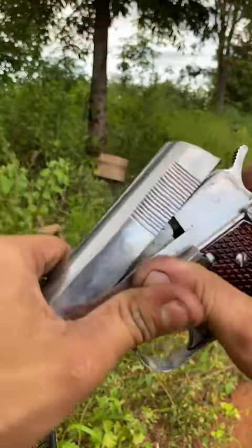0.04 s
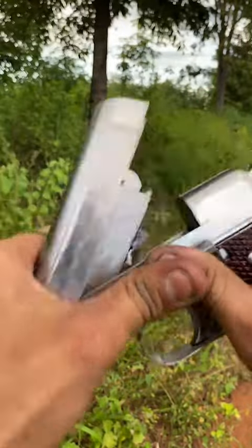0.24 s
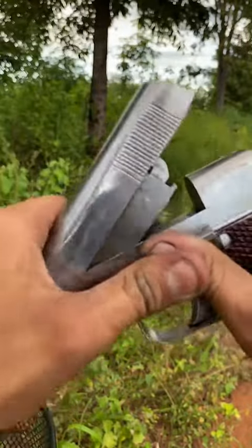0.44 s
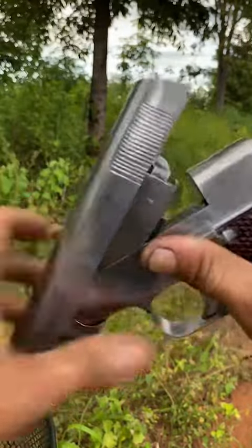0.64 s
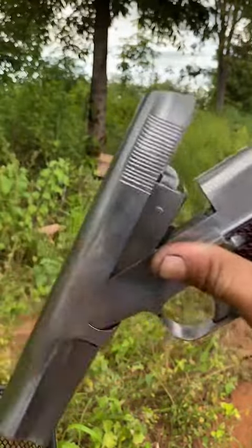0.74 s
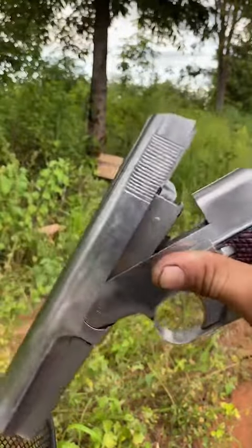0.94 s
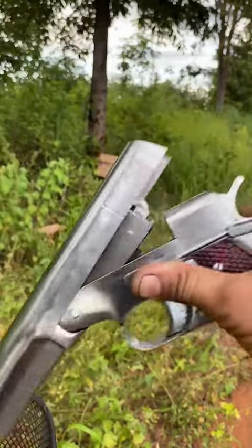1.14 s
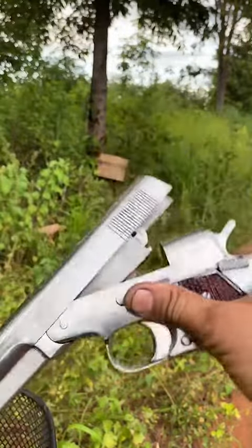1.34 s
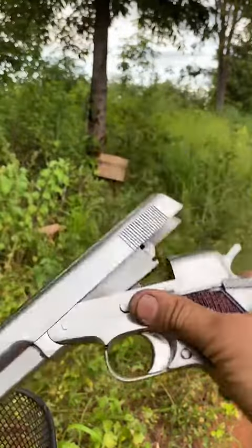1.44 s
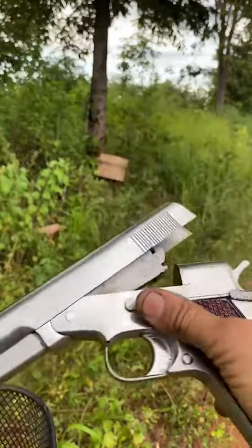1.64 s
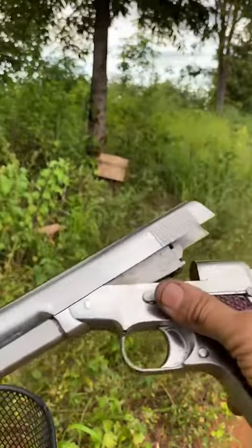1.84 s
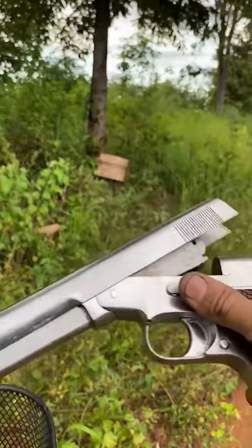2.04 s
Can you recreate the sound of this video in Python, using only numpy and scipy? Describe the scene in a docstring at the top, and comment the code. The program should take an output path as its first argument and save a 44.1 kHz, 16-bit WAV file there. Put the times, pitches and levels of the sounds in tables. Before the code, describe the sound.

A steel pistol is broken open close to the microphone with one sharp clack and a low thump. Faint handling ticks follow, while insects chirr and chirp softly among the trees.

```python
"""Outdoors among trees, a steel break-action pistol is opened close to the microphone.
Stick-slip friction at the latch excites the frame's modes; the barrel clacks against its stop,
jolts the hands and scatters sound off the trees. The hinge slides and loose parts tick.
Insects chirr all round, over a low rumble of air and handling."""
import sys
import numpy as np
from scipy import signal
from scipy.fft import rfft, irfft
from scipy.io import wavfile
from scipy.ndimage import map_coordinates

SR = 44100
rng = np.random.default_rng(int(sys.argv[2]) if len(sys.argv) > 2 else 0)


def unload_audio(sound):
    """Save the sound as a 16-bit wav file, at the path given as the first command line argument."""
    columns = np.transpose(np.atleast_2d(sound))
    # keep every value between -1 and 1, then stretch to whole-number steps
    steps = np.round(np.clip(columns, -1, 1) * 32767)
    wavfile.write(sys.argv[1], SR, steps.astype(np.int16))


N = 92610


def amp(db):
    """Amplitude ratio of a level in decibels."""
    return 10 ** (np.asarray(db) / 20)


def level(rows):
    """Gain envelope, linear in decibels between (time_s, level_db) rows."""
    return amp(np.interp(np.arange(N) / SR, *np.transpose(rows)))


def since(start_s):
    """Seconds elapsed since an onset, zero before it."""
    return np.maximum(np.arange(N) / SR - start_s, 0)


def decay(t, t60):
    """Exponential damping: 60 dB lost every t60 seconds."""
    return amp(-60 * np.minimum(t / t60, 5))


def fade(t, t60, attack_s):
    """Transient envelope: a quick rise, then exponential damping."""
    return decay(t, t60) * (1 - np.exp(-t / attack_s))


def pan(db):
    """Interaural level difference: gains with left db above right."""
    return amp(np.array([[db], [-db]]) / 2)


def wobble(knots_per_s):
    """Random modulation: a spline through Gaussian values."""
    return map_coordinates(rng.standard_normal(1000), [np.arange(N) * knots_per_s / SR], mode="wrap")


def coloured(x, colour):
    """Spectral shaping by (frequency_hz, gain_db) rows, joined on a log frequency axis."""
    hz, db = np.transpose(colour)
    gain_db = np.interp(np.log(np.fft.rfftfreq(N, 1 / SR) + 1), np.log(hz + 1), db)
    return irfft(rfft(x) * amp(gain_db), N)


def band(centre_hz, width_hz):
    """Gaussian passband, 4 dB down at width_hz from its centre."""
    return [(centre_hz + k * width_hz, -4 * k * k) for k in range(-5, 6)]


def noise(colour, coherence):
    """Partly coherent stereo noise of unit rms, mixed from mid and side signals."""
    turn = np.arccos(np.clip(coherence, -1, 1)) / 2
    mid, side = coloured(rng.standard_normal((2, N)), colour)
    x = np.cos(turn) * mid + np.sin(turn) * np.array([side, -side])
    return x / x.std()


def echo(x, t60):
    """Diffuse scattering from trunks and leaves: convolution with decaying noise."""
    tail = rng.standard_normal((2, N)) * fade(since(0), t60, 0.0061)
    return signal.fftconvolve(x, tail / np.linalg.norm(tail[0]), axes=1)[:, :N]


# Envelope of the rumble: time_s, level_db
RUMBLE_ENVELOPE = [(0, -65), (.13, -51), (.3, -68), (.75, -63.5), (1.07, -61.5), (1.25, -61), (1.5, -68.5),
                   (1.8, -76), (1.96, -69.5), (2.1, -66.5)]
# Spectra of the rumble and the hiss: frequency_hz, gain_db
RUMBLE_SPECTRUM = [(20, -22.5), (45, -2), (70, 6), (110, -2.5), (170, -17), (280, -29), (4000, -85)]
HISS_SPECTRUM = [(100, 8.5), (500, 2.5), (1200, -1.5), (7300, -13.5), (15800, -22.5)]

def air():
    """Ambient noise: a modulated rumble of air and handling under a steady hiss."""
    rumble = level(RUMBLE_ENVELOPE) * amp(1.2 * wobble(25)) * noise(RUMBLE_SPECTRUM, coherence=.99)
    return rumble + amp(-84.5) * noise(HISS_SPECTRUM, coherence=.1)


# Envelope of the highest insect: time_s, level_db
SIZZLE_ENVELOPE = [(.17, -77.5), (.3, -88), (1.5, -86.5)]
# Its spectrum: frequency_hz, gain_db
SIZZLE_SPECTRUM = [(8300, -30), (9100, -1.5), (9500, 2.5), (10300, -3), (11500, -12.5), (13000, -20.5)]

def insect_sizzle(swell_db=3.2, period_s=.29, peak_s=1.54):
    """Amplitude modulation: the highest insect swells three or four times a second."""
    swell = np.cos(2 * np.pi * (since(0) - peak_s) / period_s)
    modulation = amp(swell_db * swell + wobble(20))
    return level(SIZZLE_ENVELOPE) * modulation * noise(SIZZLE_SPECTRUM, coherence=.56)


# Envelopes of the chorus and the cricket, both dipping after the clack: time_s, level_db
CHORUS_ENVELOPE = [(0, -56.5), (.19, -62.5), (.25, -76), (.37, -86.5), (.45, -66.5), (1.2, -65), (1.6, -64),
                   (2.1, -63)]
CRICKET_ENVELOPE = [(0, -73), (.16, -67), (.25, -105), (.62, -105), (.72, -77.5), (1.2, -83.5),
                    (1.32, -105), (1.5, -78), (1.68, -74.5), (1.82, -87.5), (2.05, -78.5)]
# Spectrum of the chorus: frequency_hz, gain_db
CHORUS_SPECTRUM = [(2500, -70), (3700, -31), (4150, -12), (4550, 1), (4950, 0), (5350, -8), (5800, -23.5),
                   (6600, -25), (7200, -58)]

def insect_chorus():
    """Incoherent summation: far insects merge into a fluttering band; one cricket buzzes above."""
    crowd = level(CHORUS_ENVELOPE) * amp(1.65 * wobble(51)) * noise(CHORUS_SPECTRUM, coherence=.2)
    buzz = noise(band(centre_hz=8020, width_hz=150), coherence=0)
    return crowd + level(CRICKET_ENVELOPE) * amp(1.5 * wobble(30)) * buzz


# Trains of insect chirps, the nearest first: first_s, last_s, level_db
CHIRP_TRAINS = [(0.013, .148, -54.5), (.43, .565, -71), (0.623, .765, -67), (1.01, 1.145, -78.5),
                (1.21, 1.277, -69.5), (1.337, 1.67, -65.5), (1.73, 1.865, -73), (1.932, 2.065, -63.5)]

def insect_chirps(period_s=.0675, length_s=.04, pitch_hz=6720, fall_hz_per_s=18000):
    """Falling frequency sweeps; fainter trains have a lower direct-to-reverberant ratio."""
    song, direct = np.zeros((2, N))
    nearest_db = CHIRP_TRAINS[0][2]
    for first_s, last_s, db in CHIRP_TRAINS:
        for k in range(round((last_s - first_s) / period_s) + 1):
            t = since(first_s + k * period_s + .003 * rng.normal())
            cycles = (pitch_hz + 50 * rng.normal()) * t - fall_hz_per_s * t ** 2 / 2
            note = amp(db) * np.sin(np.pi * np.minimum(t / length_s, 1)) * np.sin(2 * np.pi * cycles)
            song += note
            direct += amp(.4 * (db - nearest_db)) * note
    return amp(-3.5) * direct * pan(db=2) + amp(-2) * echo(song[None], t60=.25)


# Bumps of the hands on the grip: start_s, level_db, t60_s
GRIP_BUMPS = [(0.2138, -27, 0.055), (0.995, -62, 0.16), (2.046, -68, 0.29)]
# Their spectrum: frequency_hz, gain_db
BUMP_SPECTRUM = [(40, 0), (120, 0), (470, -3), (650, -15), (1200, -29), (4000, -51.5)]
# Low hums as the hands shift: start_s, length_s, pitch_hz, level_db
GRIP_HUMS = [(0.1, 0.09, 73.3, -42.5), (.212, .06, 30, -31), (.28, 0.2, 47.8, -48.5),
             (0.465, 0.24, 46.86, -50), (1.01, 0.13, 115.9, -55)]

def hands():
    """Handling noise: soft contacts put their energy into low bumps and hums."""
    bumps = sum(amp(db) * fade(since(s), t60, .0022) for s, db, t60 in GRIP_BUMPS)
    out = bumps * noise(BUMP_SPECTRUM, coherence=.48)
    for start_s, length_s, hz, db in GRIP_HUMS:
        t = since(start_s)
        out += amp(db) * np.sin(np.pi * np.minimum(t / length_s, 1)) * np.sin(2 * np.pi * hz * t)
    return out


def jolt(start_s=.2126, start_hz=480, end_hz=68, sink_s=.0026):
    """Damped oscillation: the stop gives the hands a low push whose pitch sinks as it dies."""
    t = since(start_s)
    cycles = end_hz * t + (start_hz - end_hz) * sink_s * (1 - np.exp(-t / sink_s))
    return amp(-7) * fade(t, t60=.04, attack_s=.00097) * np.sin(2 * np.pi * cycles) * pan(db=-2)


# Envelope of the sliding hinge: time_s, level_db
HINGE_ENVELOPE = [(0, -82.5), (.3, -81), (.46, -71.5), (.6, -81), (.72, -88.5), (.85, -110)]
# Spectrum of the sliding steel, also given to the clack's scatter: frequency_hz, gain_db
STEEL_SPECTRUM = [(300, -11), (1200, -13.5), (2200, 2.5), (4000, 1.5), (6000, -6.5), (7500, -22),
                  (9200, -3.5), (11500, -3.5), (13000, -23), (15800, -24.5)]

def hinge():
    """Sliding friction: steel on steel makes noise with a rapidly flickering level."""
    return level(HINGE_ENVELOPE) * amp(1.5 * wobble(140)) * noise(STEEL_SPECTRUM, coherence=.52)


# Contacts of loose parts: start_s, level_db, pitch_hz, ring_db, edge_trim_db, body_trim_db
LOOSE_CONTACTS = [(.1698, -50, 2900, 3, -11, -8), (0.1745, -55, 2550, 4, -12, -2),
                  (0.3625, -53, 2247, 0, 5, -24), (0.4222, -52, 2817, 3, -3, 1),
                  (0.5505, -47, 2820, 5, -5, -5), (.552, -49, 4895, 5, 5, -11),
                  (0.7322, -68, 1100, 0, -12, 13), (0.914, -60, 2635, 5, -10.5, -5.5),
                  (1.455, -76, 2780, 3, -20, -12), (1.7639, -47.5, 2827, 2, -18, -4),
                  (1.7834, -57, 3114, 0, -20, 8), (1.9048, -54, 2852, -0.5, -18, -12.5)]
# Spectra of a tick's click, bright edge and dull body: frequency_hz, gain_db
CLICK_SPECTRUM = [(700, -31), (1300, -12.5), (2000, -8), (2800, 3.5), (3400, -5), (4100, -6), (5500, -4),
                  (7500, -28), (15800, -54.5)]
EDGE_SPECTRUM = [(2500, -30), (5000, 0), (7500, -12.5), (9000, -3), (11200, 1), (14000, -20)]
BODY_SPECTRUM = [(250, -20), (620, 1), (950, -8.5), (1320, 5), (1550, -8), (2100, -9), (3500, -30)]

def loose_parts(attack_s=.00047):
    """Impulsive excitation: each light contact gives a noise burst and rings one damped mode."""
    out = np.zeros((2, N))
    click = noise(CLICK_SPECTRUM, coherence=.6)
    edge = amp(-7.5) * noise(EDGE_SPECTRUM, coherence=.2)
    body = amp(-13.5) * noise(BODY_SPECTRUM, coherence=.7)
    for start_s, db, hz, ring_db, edge_trim_db, body_trim_db in LOOSE_CONTACTS:
        t = since(start_s)
        ring = amp(ring_db) * fade(t, .027, attack_s) * np.sin(2 * np.pi * hz * t)
        snap = (click + amp(edge_trim_db) * edge) * fade(t, .02, attack_s)
        knock = amp(body_trim_db) * body * fade(t, .03, attack_s)
        out += amp(db) * (ring + snap + knock)
    return out + amp(-13) * echo(out, t60=.17)


# Envelope of the latch rubbing under the thumb: time_s, level_db
RUB_ENVELOPE = [(.01, -81), (.1, -94), (.165, -69), (.2, -110)]
# Slips of the latch as it drags free: start_s, level_db
LATCH_SLIPS = [(0.1907, -42), (.195, -28), (.1972, -26), (.2018, -20), (.2047, -19), (0.207, -15),
               (0.2077, -17)]
# Modes of the steel frame: pitch_hz, level_db, left_minus_right_db
FRAME_MODES = [(1874, -13, -1), (2340, -5.5, 1), (2512.5, -8, 0), (2723, -10, -8), (2850, -7, -5),
               (3580, -3, 8), (3820, -11, 8), (4170, -10, 7.5), (4494, -8, 8), (4660, -10, 2.5),
               (4930, -15, -5), (5270, -12, 3)]
# Transfer function of the frame: frequency_hz, gain_db
FRAME_RESPONSE = [(650, -20), (950, -11), (1250, -27), (1650, -16), (1870, -1.5), (2080, -10.5), (2380, 3),
                  (2850, 1.5), (3170, -9.5), (3550, 0.5), (4800, 1), (6200, -13), (7400, -25.5),
                  (8400, -19.5), (15800, -28)]

def latch(release_s=.2085, rise_db_per_s=1600):
    """Stick-slip friction drives the frame's modes over a scrape; on release the hand damps both."""
    t, free = since(0), since(release_s)
    ear_phase_rad = np.array([[.4], [-.4]])
    drive = sum(amp(db) * fade(since(s), t60=.024, attack_s=.00015) for s, db in LATCH_SLIPS)
    from_last_slip = t - LATCH_SLIPS[-1][0]
    modes = sum(pan(side_db) * amp(db) * np.sin(2 * np.pi * hz * from_last_slip + ear_phase_rad)
                for hz, db, side_db in FRAME_MODES)
    ring = drive * modes * decay(free, t60=.046)
    swell = amp(-13 - rise_db_per_s * np.maximum(release_s - t, 0))
    friction = rng.standard_normal(N) + .57 * rng.standard_normal((2, N))
    scrape = swell * friction * pan(db=4) * decay(free, t60=.021)
    rub_gain = level(RUB_ENVELOPE) * amp(2 * wobble(100))
    rub = rub_gain * noise(band(centre_hz=2770, width_hz=170), coherence=.5)
    return rub + coloured(ring + scrape, FRAME_RESPONSE)


# Impacts of the barrel on its stop, and blows that ring the barrel: start_s, level_db
STOP_IMPACTS = [(.2087, -19), (.2095, -6), (0.2123, -23)]
RINGING_BLOWS = [(.209, -39), (.3635, -74), (.552, -70)]
# Spectrum of the impacts: frequency_hz, gain_db
CRACK_SPECTRUM = [(800, -10.5), (1300, -20), (2500, -2), (4000, -1), (5500, 0.5), (6600, -3), (7800, -17),
                  (8350, 6), (9100, 10), (9550, -4), (10200, 3), (11000, -4), (12450, 3), (13200, -1),
                  (14500, -3), (15800, -9)]

def barrel_stop(ring_hz=903):
    """Hard impact: brief contacts give broadband cracks, a faint ring and scatter from the trees."""
    impacts = sum(amp(db) * fade(since(s), t60=.0081, attack_s=.00015) for s, db in STOP_IMPACTS)
    spray = amp(-37.5) * fade(since(STOP_IMPACTS[-1][0]), t60=.05, attack_s=.002)
    cracks = coloured((impacts + spray) * rng.standard_normal((2, N)), CRACK_SPECTRUM)
    ear_phase_rad = np.array([[.8], [-.8]])
    ring = np.zeros((2, N))
    for start_s, db in RINGING_BLOWS:
        t = since(start_s)
        mode = np.sin(2 * np.pi * ring_hz * t + ear_phase_rad)
        ring += amp(db) * fade(t, t60=.13, attack_s=.00061) * mode
    scatter = amp(-48) * fade(since(STOP_IMPACTS[0][0]), t60=.17, attack_s=.0018)
    return cracks * pan(db=-.5) + ring + scatter * noise(STEEL_SPECTRUM, coherence=.3)


def scene():
    """Linear superposition of the pistol, the insects and the air."""
    pistol = latch() + barrel_stop() + loose_parts() + hinge() + jolt() + hands()
    return pistol + insect_chorus() + insect_chirps() + insect_sizzle() + air()


def record(dry):
    """Soft saturation rounds the loudest peaks; a raised-cosine low-pass limits the band."""
    ceiling, cutoff_hz, transition_hz = .85, 15800, 400
    rounded = dry / (1 + (dry / ceiling) ** 6) ** (1 / 6)
    passed = np.clip((cutoff_hz - np.fft.rfftfreq(2 * N, 1 / SR)) / transition_hz + .5, 0, 1)
    return irfft(rfft(rounded, 2 * N) * np.sin(passed * np.pi / 2) ** 2)[:, :N]


dry = scene()
out = record(dry)
unload_audio(out)
```